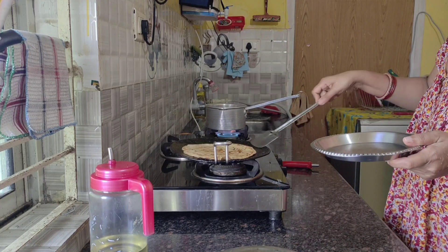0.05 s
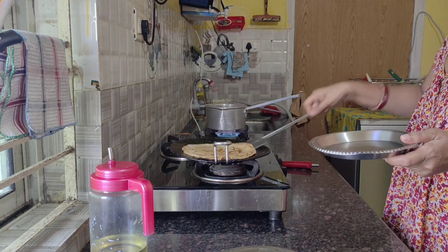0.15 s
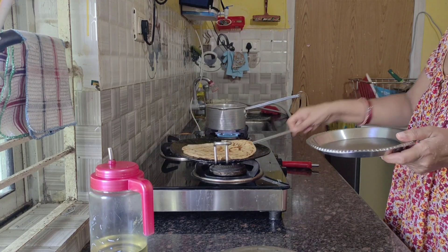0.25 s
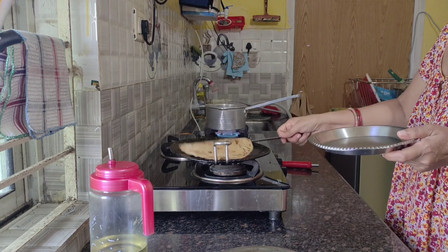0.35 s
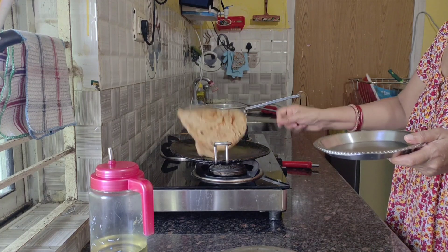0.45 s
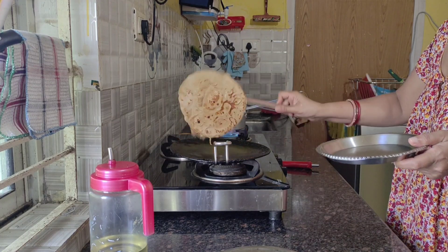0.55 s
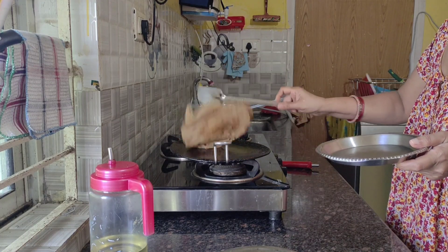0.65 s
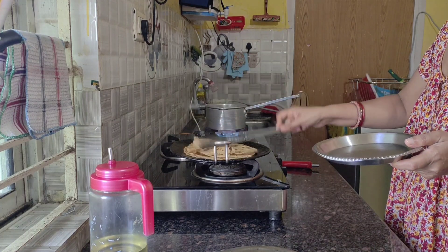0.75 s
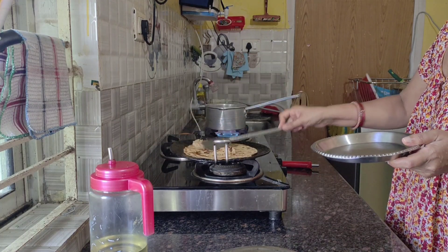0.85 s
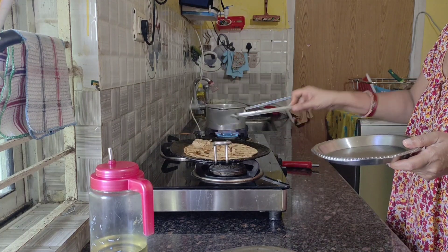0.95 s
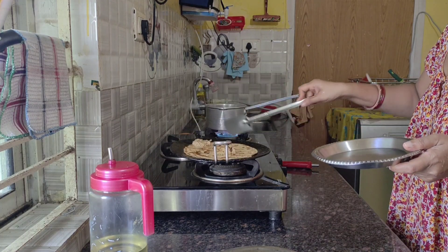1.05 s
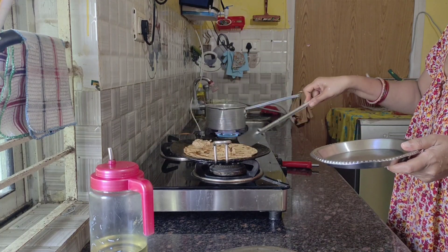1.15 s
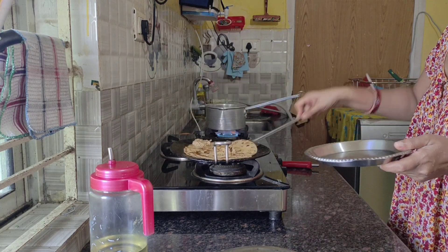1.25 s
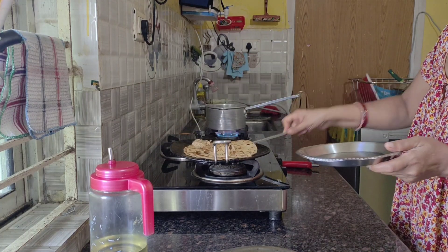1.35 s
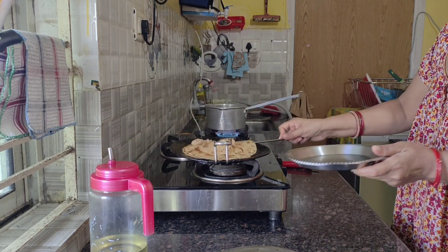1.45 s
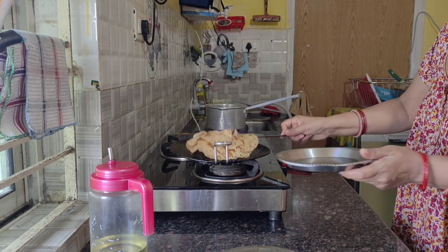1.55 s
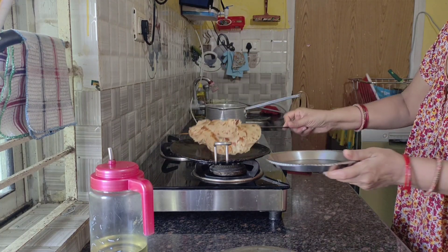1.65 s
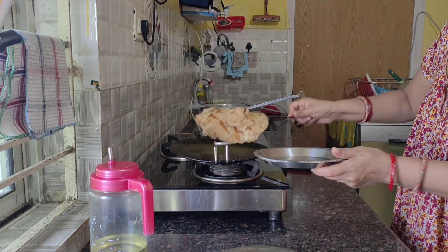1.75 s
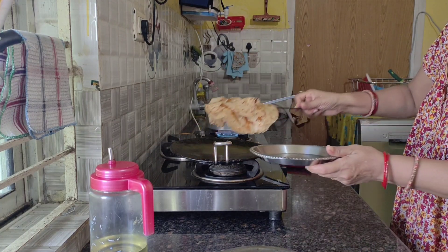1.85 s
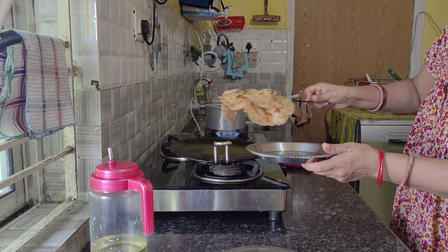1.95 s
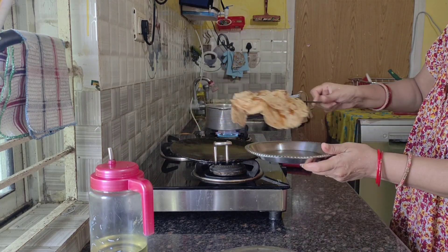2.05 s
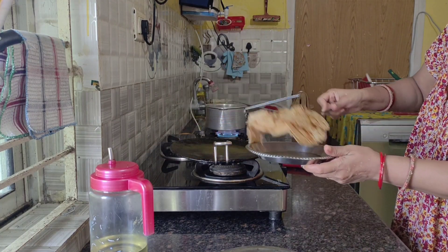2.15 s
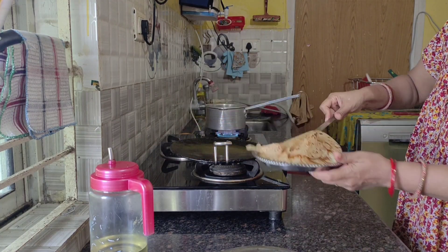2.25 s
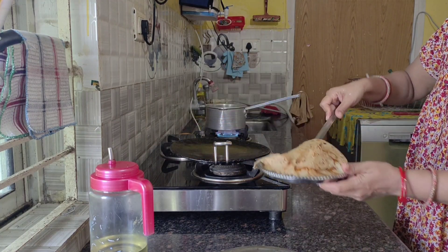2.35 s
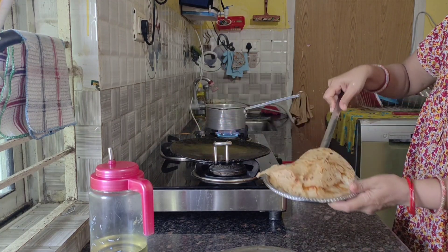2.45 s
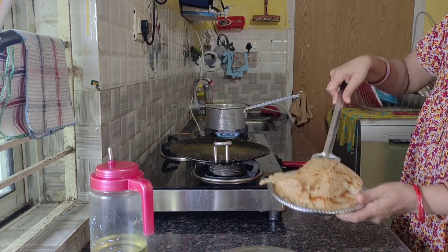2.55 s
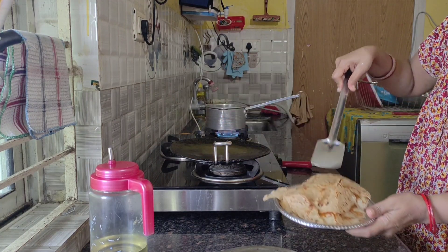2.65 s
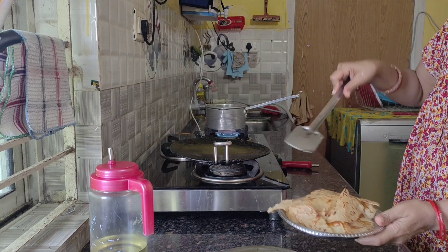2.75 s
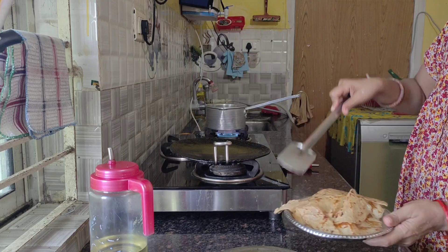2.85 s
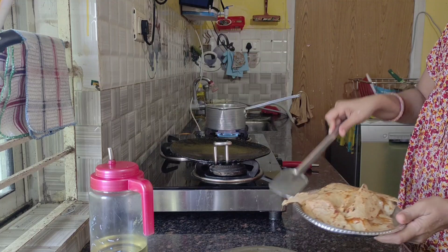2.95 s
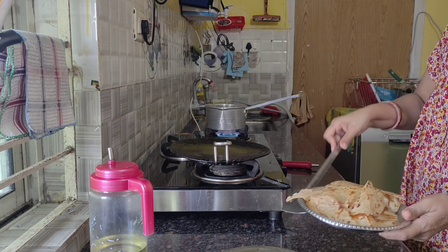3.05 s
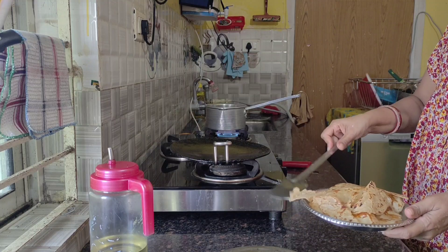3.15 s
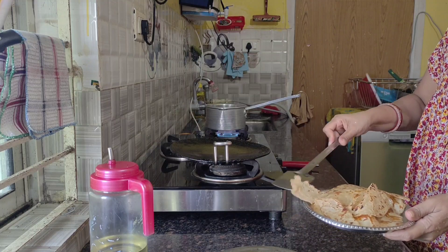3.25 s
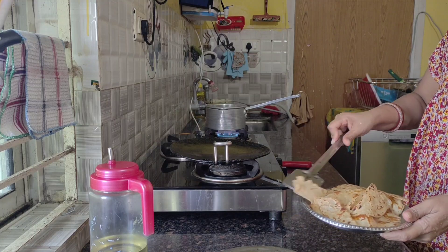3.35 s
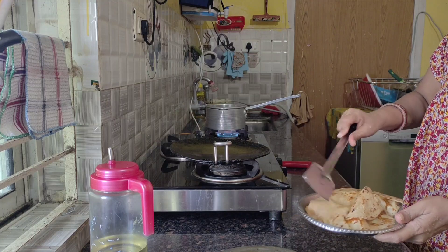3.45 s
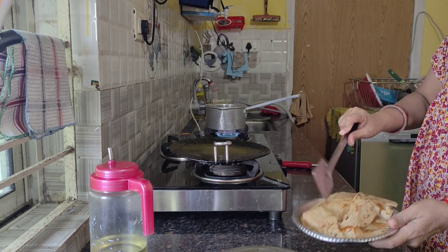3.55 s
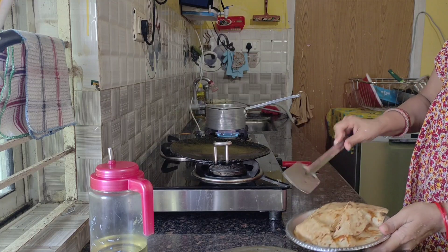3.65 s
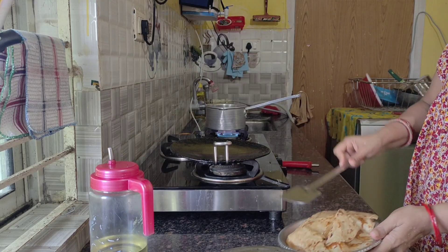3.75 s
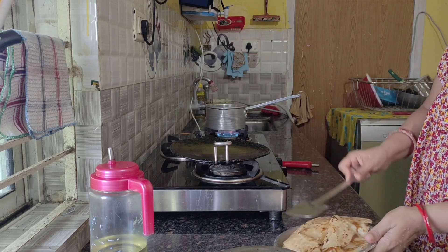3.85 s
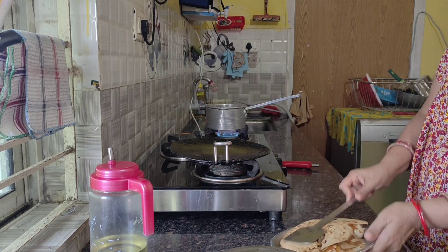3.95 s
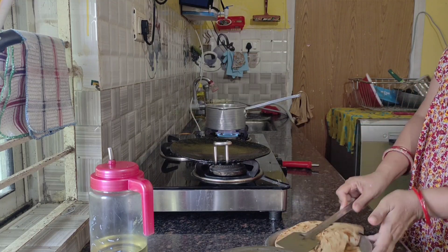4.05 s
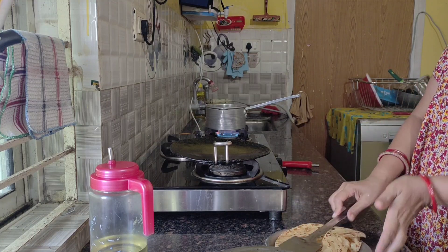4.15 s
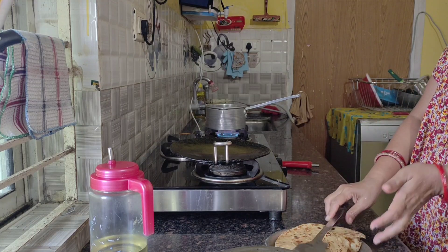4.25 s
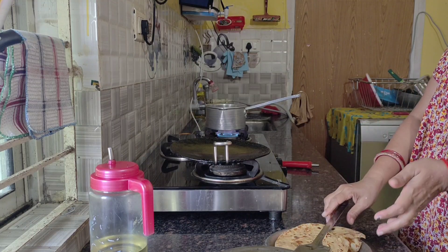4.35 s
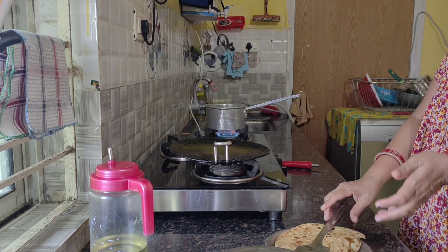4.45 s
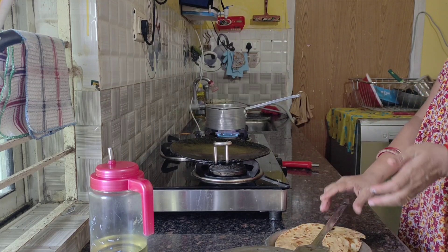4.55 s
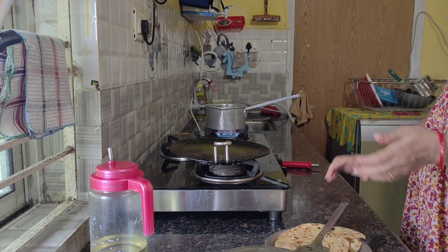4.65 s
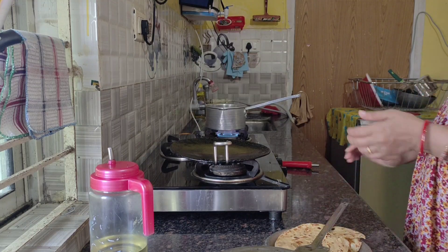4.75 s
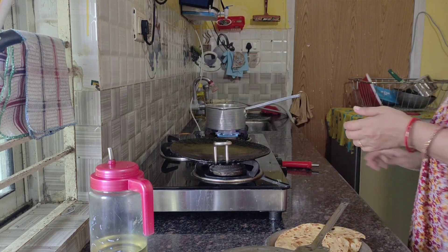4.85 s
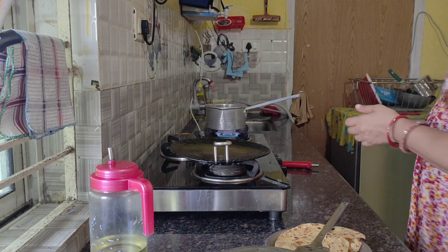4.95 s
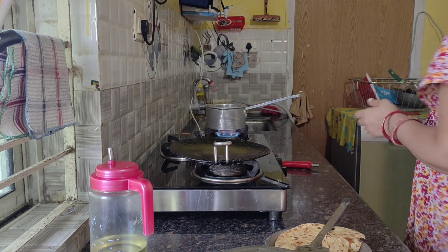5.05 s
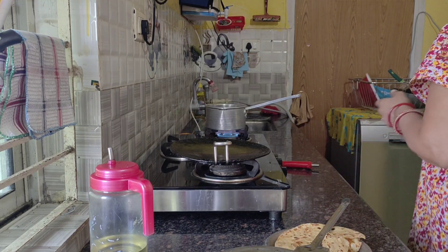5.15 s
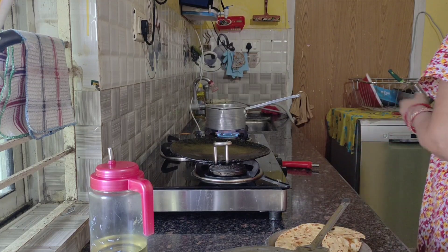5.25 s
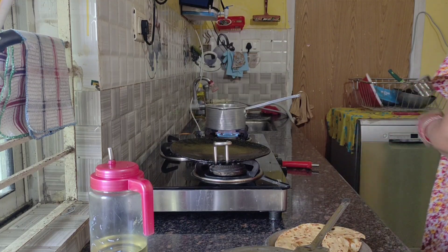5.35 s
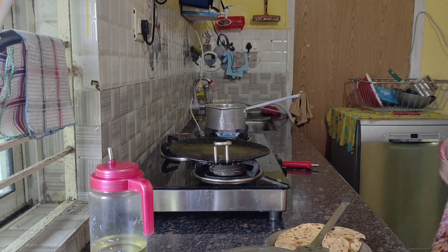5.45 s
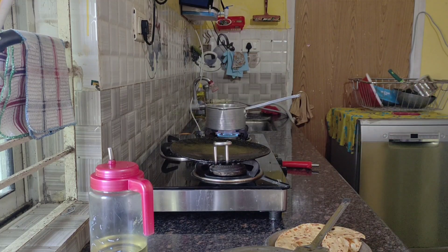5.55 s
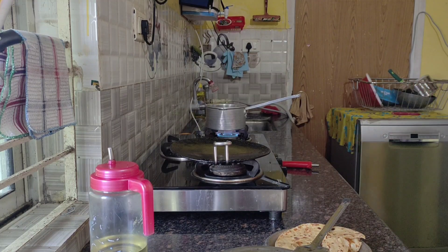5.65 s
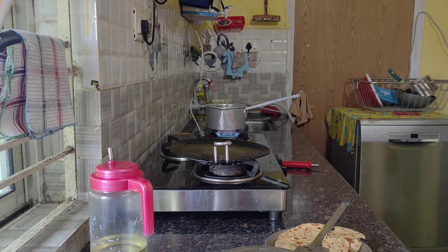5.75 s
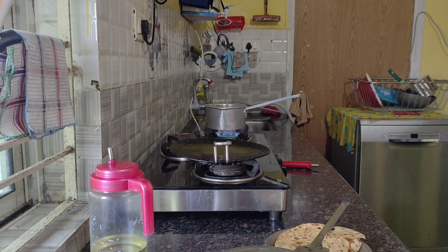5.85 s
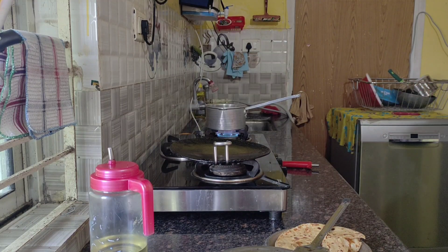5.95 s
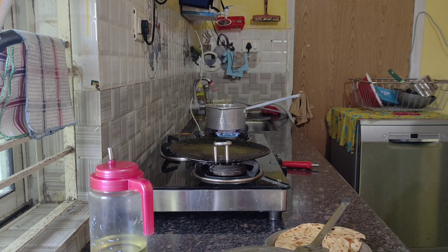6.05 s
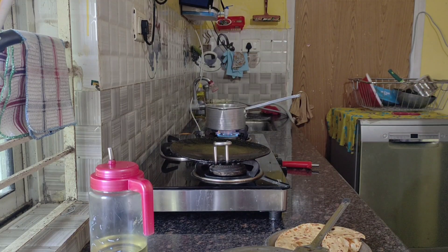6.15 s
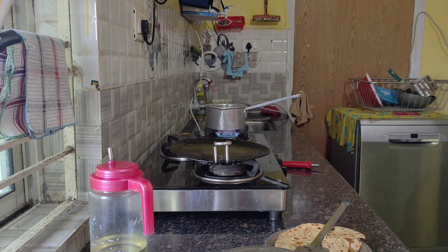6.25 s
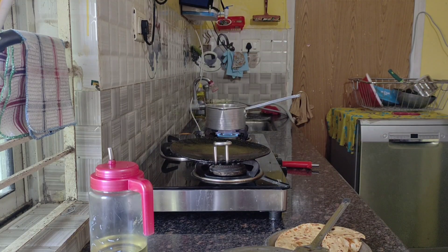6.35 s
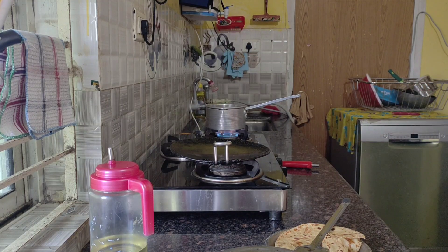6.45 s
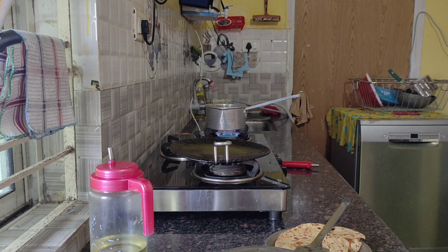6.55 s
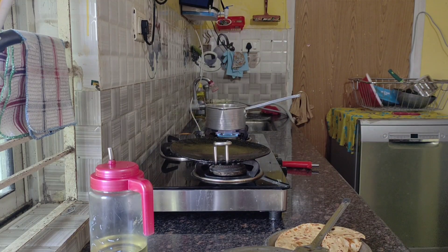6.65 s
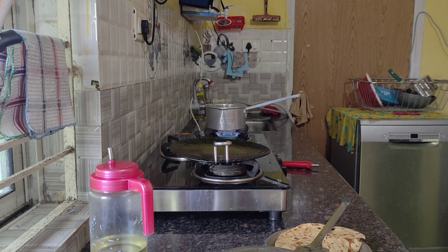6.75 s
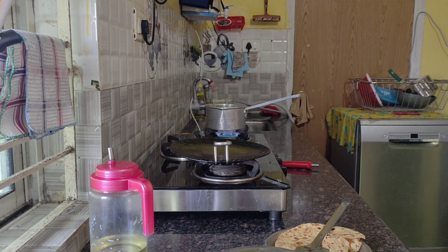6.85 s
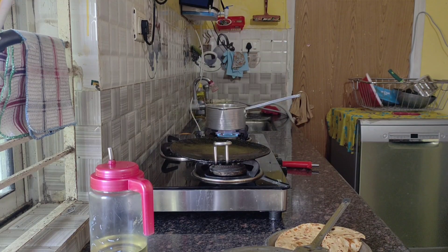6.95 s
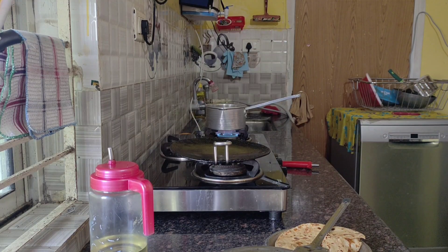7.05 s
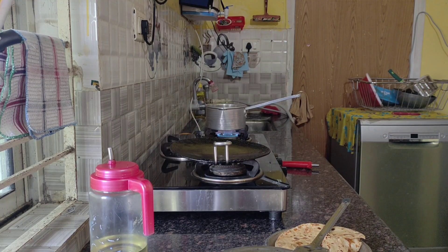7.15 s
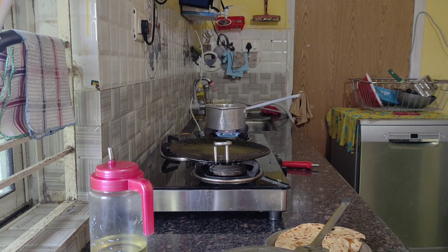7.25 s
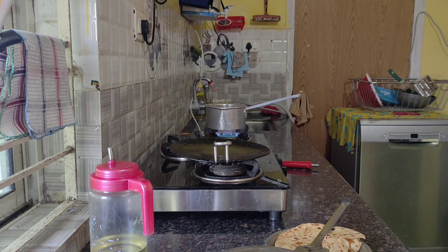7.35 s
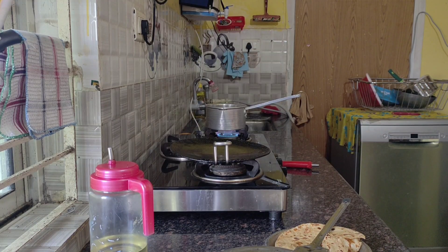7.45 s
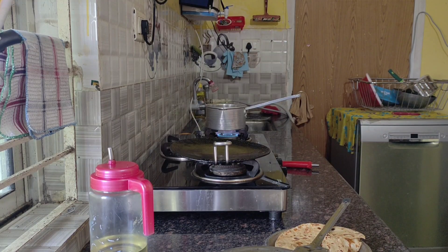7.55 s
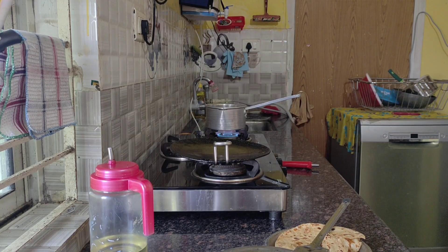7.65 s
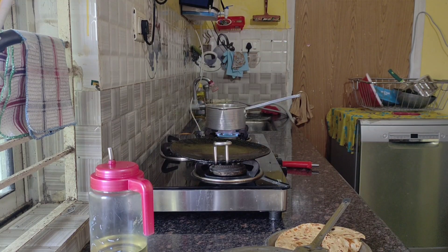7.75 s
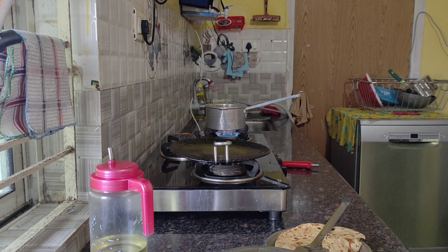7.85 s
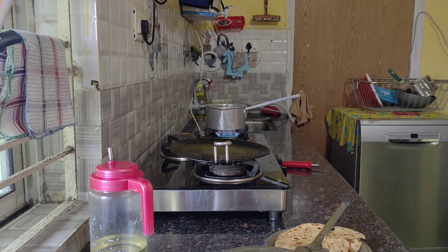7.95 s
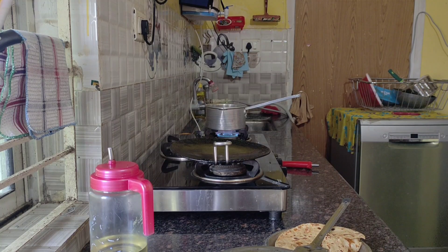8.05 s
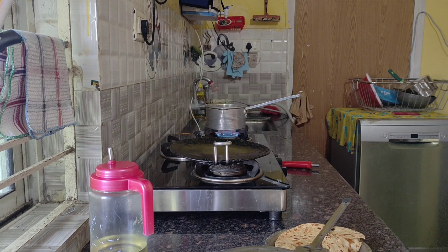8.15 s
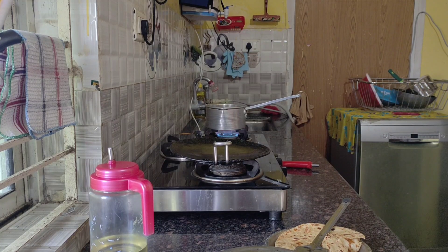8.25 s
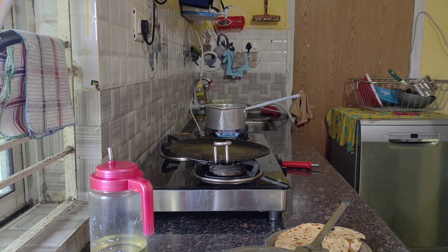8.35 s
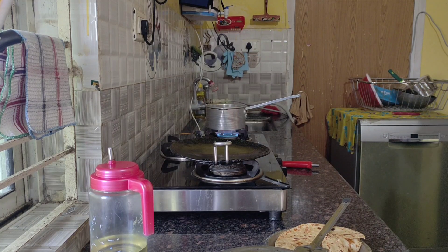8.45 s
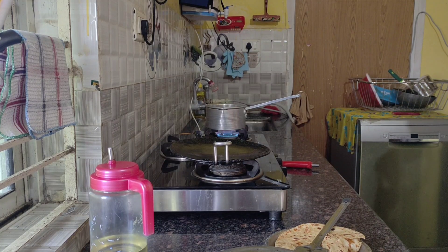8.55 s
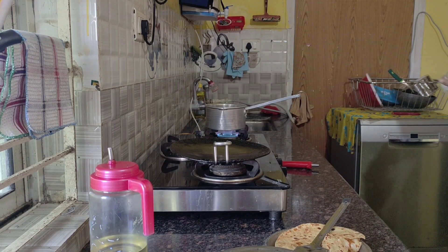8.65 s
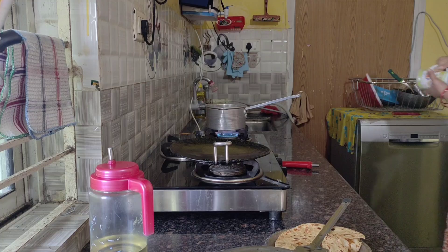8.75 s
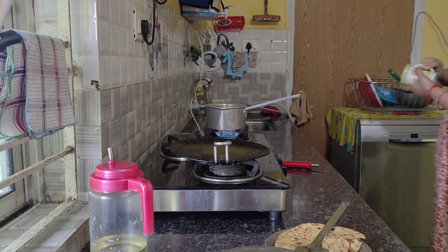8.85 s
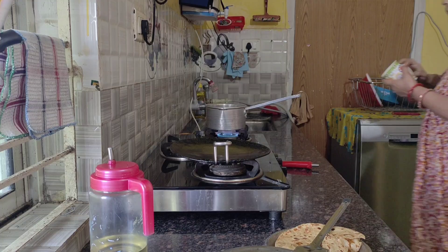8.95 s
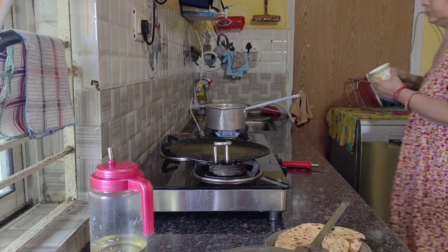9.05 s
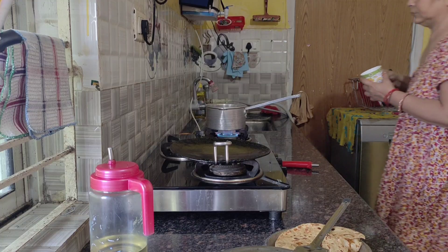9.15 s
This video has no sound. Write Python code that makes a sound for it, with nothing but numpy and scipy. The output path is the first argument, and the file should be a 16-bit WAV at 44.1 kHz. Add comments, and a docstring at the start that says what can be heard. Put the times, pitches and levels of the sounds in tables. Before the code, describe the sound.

In a small tiled kitchen, a steel spatula scrapes and taps an iron griddle close to the microphone, and the griddle knocks softly on its burner. Farther off, a steel plate lands loudly on a stone counter and the spatula clatters onto it. Slippers then shuffle over the floor, a lid clacks and steel cups clink across the room. A low fridge hum and faint hiss continue underneath.

```python
"""A steel spatula scrapes flatbread off an iron griddle, which rocks on its burner, in a small tiled kitchen.
A steel plate is set down on the stone counter and the spatula drops on it. The cook shuffles off in
slippers, clinks steel cups at a rack and returns. Each blow is a crack plus the object's ringing modes;
each scrape is a run of tiny slips. Griddle and slippers sound close, plate and cups farther off in the
room's echo, over a fridge hum. The microphone is a camera's stereo pair; its gain ducks the loudest blows."""
import sys
import numpy as np
from scipy import signal
from scipy.fft import rfft, irfft, next_fast_len
from scipy.io import wavfile
from scipy.ndimage import uniform_filter1d, map_coordinates

SR = 44100
rng = np.random.default_rng(int(sys.argv[2]) if len(sys.argv) > 2 else 0)


def int16_out(signal):
    """Quantize to a 16-bit WAV file."""
    q = np.round(np.clip(np.atleast_2d(signal).T, -1, 1) * 32767)
    wavfile.write(sys.argv[1], SR, q.astype(np.int16))


N = 406161

# Blows: start_s, level_db, tilt_db_per_octave, chatter_s, contact_point (0 to 1), ring_over_crack_db
SPATULA_BLOWS = [(.292, -37.5, -2, 0.011, 1, -14.5), (.518, -44, 0, 0.01, 0.7, -8.5),
                 (.8495, -23, -1.5, 0.0016, 0.35, -11), (1.078, -38.5, -2, .0033, 0.97, 10),
                 (1.231, -30.5, -2.5, 0.0032, 0.54, -4), (1.608, -40.5, -1, 0.009, 0.5, 1.5),
                 (2.4725, -24, -1, .008, 0.9, 20.5), (2.497, -26.5, -0.5, 0.011, 0.68, 12),
                 (2.675, -27, 3.5, 0.0095, 0.1, 16), (2.703, -38, 1, 0.0044, 0.1, 15.5)]
PLATE_BLOWS = [(3.9385, -7, -1, 0.0074, 1, 6.4), (3.967, -15, -1, 0.01, 0.9, 8.3),
               (4.016, -23, 3, .003, 0.33, 4), (4.2155, -14.5, -8, 0.0047, 0, 1),
               (4.223, -7, 2, .01, 0.046, 1.8), (4.245, -16.5, -2.5, .012, 0, 1.8)]
CUP_CLINKS = [(7.098, -20, 4, .012, 0.92, 22.9), (7.125, -19, 1, 0.014, 0.93, 20),
              (7.166, -22.5, 1.5, 0.011, 1, 15), (7.762, -17, 2, 0.012, 0.295, 6.58),
              (7.79, -14, 0, .018, 0.046, 15)]
# Blows at one contact point: start_s, level_db, tilt_db_per_octave, chatter_s
RIM_GLANCES = [(.8505, -37, -15, 0.0013), (1.231, -35.5, 1.5, 0.0015), (2.281, -34.5, 4.5, 0.025)]
LID_BLOWS = [(6.681, -25, 0.5, 0.02)]
# Spatula strokes: start_s, length_s, level_db, tilt_db_per_octave, ring_over_rasp_db
SPATULA_STROKES = [(0.029, 0.039, -34, 2.5, -6), (0.325, 0.056, -24, -0.5, 0), (0.848, 0.067, -33.5, 0, -8),
                   (1.404, 0.058, -24, 0, -2), (2.609, 0.054, -28.5, 4.5, -8.5),
                   (3.581, 0.07, -49, 2.5, -15)]
# The griddle tipping against its burner: start_s, level_db
BURNER_KNOCKS = [(.149, -40.5), (.248, -40), (.502, -41.5), (.563, -43.5), (.828, -32), (.923, -30.5),
                 (.966, -27.5), (1.058, -34.5), (1.212, -40.5), (1.236, -35.5), (1.274, -45), (1.38, -38),
                 (1.456, -42), (1.585, -38.5), (1.668, -41.5), (1.735, -49.5)]
# Slippers on the floor, plus one bright rustle of clothes at 6.012 s: start_s, length_s, level_db, swell_db,
# tilt_db_per_octave
SLIPPER_DRAGS = [(5.032, 0.025, -40, -3, 0.5), (5.508, 0.075, -42, -11, 0.5), (5.62, 0.067, -28, 5, 1),
                 (6.012, 0.042, -36, -13.5, 7.5), (6.05, 0.12, -35, 1, 1), (6.393, 0.0224, -28.5, -5, 0),
                 (6.832, 0.56, -40.5, -20.5, 4), (7.219, 0.19, -36, -4.5, 1),
                 (7.723, 0.014, -29.5, -3, -1.5), (7.939, 0.13, -41.5, -6, 1.5), (8.42, 0.087, -34, 0, 1.5),
                 (8.87, 0.12, -38.5, -1, 2), (9.035, 0.039, -36.5, -6.5, 2.5),
                 (9.122, 0.022, -33.5, -26, 2.5)]
# Stove, shelf and feet: start_s, level_db, tilt_db_per_octave
DULL_BUMPS = [(1.266, -38, 2), (6.393, -36, -6), (6.739, -35.5, 4.5), (6.815, -34.5, 4), (6.864, -34, -5),
              (7.725, -31, 2.5), (9.119, -35.5, 7)]

# Modes that depend on the contact point: pitch_hz, level_at_1_db, level_at_0_db, t60_s
SPATULA_MODES = [(450, 1, -24, .05), (790, -2, 3, .06), (1260, -2, -20, .03), (1630, 0, -26, .03),
                 (1873, -2, -9, .06), (2380, -10, -10, .04), (2789, -1, 3, .09), (3060, -4, -7, .03),
                 (3214, -14, 0, .08), (3420, -10, -3, .04), (3850, -5, -12, .045), (4382, -12, -6, .07),
                 (5270, -17, -10, .05), (7052, -9, -14, .05), (7494, -14, -6, .06)]  # 1 pressed down, 0 springing free
PLATE_MODES = [(735, -16, -4, .035), (825, -4, -3, .12), (930, -6, -6, .04), (1373, -16, -2, .04),
               (1860, -12, -9, .05), (2261, -19, -5, .09), (2762, -16, -10, .05), (2912, -15, -4, .08),
               (3036, -2, -3, .17), (3105, -5, 0, .13), (3195, -1, -1, .13), (3280, 1, -4, .07),
               (3368, 0, -6, .09), (3415, 2, -8, .14), (4240, -15, -8, .04)]  # 1 landing on its foot, 0 under the spatula
CUP_MODES = [(1157, -7, 4.5, .34), (1280, -2, -7, .26), (1954, -10, -17, .28), (2182, -11, -7, .22),
             (2442, -4, -8, .18), (3110, -9, 2, .45), (3752, 0, -1, .19), (5218, 2, -11, .16),
             (5598, -5, -6, .24), (6342, -20, -8, .16), (6657, 1, -12, .11), (7500, -7, -12, .06),
             (7936, -7, -19, .12), (8125, -6, -12, .09), (9350, -8, -12, .05), (12490, -14, -15, .04),
             (10440, -13, -17, .1), (13600, -12, -12, .03), (15000, -12, -23, .04)]  # 1 rim, 0 base
# Modes with one set of levels: pitch_hz, level_db, t60_s
RIM_MODES = [(3031, -3, .12), (3300, 0, .05), (3445, 6, .12), (3590, 3, .07), (4360, -6, .14),
             (5443, -4, .13), (8915, -12, .05), (6740, -5, .08), (7418, -11, .05)]
GRIDDLE_MODES = [(638, -4, .1), (707, 6, 0.14), (784, 3.5, 0.12), (1343, -2, 0.054), (2110, -7, .05)]
LID_MODES = [(1400, -2, .05), (1780, -7, .02), (2900, -5, .03), (3321, 0, .06), (3494, -5, .04),
             (5588, -2, .1), (6110, -10, .04), (7763, -4, .04)]
RACK_MODES = [(193, -1.5, 0.29), (243, 2, 1)]
# The blade pressed on the iron: pitch_hz, level_db
BLADE_MODES = [(1350, -0.5), (1520, -7), (1750, -5), (2095, -1), (2510, 2), (3115, 2), (3720, -1),
               (4960, -7), (5320, -2.5), (7100, -10)]

# Spectra of cracks, thuds, friction and room tone: frequency_hz, relative_level_db
SPATULA_SPECTRUM = [(120, -30), (300, -16.5), (600, -12), (3200, 6), (4800, -7.5), (8000, -9), (16000, -14)]
GRIDDLE_SPECTRUM = [(150, -8), (420, -5), (750, 12.5), (1500, -11), (2500, -12.5), (5000, -61),
                    (16000, -64)]
PLATE_SPECTRUM = [(120, -44.5), (300, -48), (570, -18.5), (790, 3), (1120, -6.5), (2560, -6.5), (3130, 4),
                  (3850, -15), (4900, -32), (11900, -18), (16000, -25)]
CUP_SPECTRUM = [(300, 5), (1200, 0), (3000, 7.5), (8000, 0), (16000, -17)]
COUNTER_THUD = [(40, -30), (85, 5), (160, 12.5), (260, -16), (16000, -72)]
DULL_THUD = [(50, -31), (120, -5.5), (175, 2.5), (280, -13.5), (700, -17.5), (2000, -40), (16000, -84.5)]
IRON_RASP = [(290, -50), (807, -26), (1320, -1.5), (3810, -3.5), (4300, -9.5), (5160, -7.5), (6140, -9.5),
             (16000, -14)]
SOLE_RASP = [(200, -16), (450, -14.5), (750, 2), (1300, 3), (2600, 4.5), (5000, -4.5), (9000, -13),
             (16000, -19)]
ROOM_TONE = [(15, -47.5), (25, -29.5), (70, -17.5), (102, -4), (263, -16), (300, -22.5), (451, -25.5),
             (754, -28), (3620, -40.5), (5880, -45), (16000, -44.5)]
# Decay of the tiled room: frequency_hz, t60_s
KITCHEN_DECAY = [(150, 0.11), (700, 0.31), (3000, 0.34), (8000, 0.27), (16000, 0.2)]
# Room tone across the two microphones: frequency_hz, likeness (below 0 counts as 0)
STEREO_LIKENESS = [(60, 0.98), (180, 0.96), (550, -1.2), (1650, -0.17), (4970, -0.084), (15000, -0.23)]
# The room tone's treble rising and falling: time_s, gain_db
TREBLE_DRIFT = [(0, 9), (1.9, 5), (3, 1.5), (4.6, -0.5), (5.3, 4), (7.6, -0.5), (9.2, 5.5)]
# Fridge hum: pitch_hz, level_db
FRIDGE_TONES = [(100.3, -49.5), (172, -54.5)]

TOP_HZ, EVENT_SAMPLES = 16000, 30000
BLADE_T60_S, SCRAPE_SWELL_DB = .06, -7.5  # the blade eases off over each stroke
FLEX, MOVE_S, CATCH_PER_S = 0.024, .04, 110  # relative pitch scatter; time between spots; catch rate
SHEET_FROM_HZ, SHEET_T60_S, SHEET_SCATTER_DB = 5600, .06, 4.5
GRIDDLE_TILT_DB, GRIDDLE_CHATTER_S, BUMP_CHATTER_S = 4, .011, 0.021
HARDENING = 0.13  # dB per octave of extra tilt for each dB above the average knock
DIRECT_RING_DB = -6.5  # ring reaching the microphones in a straight line, against the room's answer


def spatula_scrapes():
    """The spatula rasps under the bread; on bare iron its blade catches and rings, in bread it is muted."""
    blade = [(hz, db, BLADE_T60_S) for hz, db in BLADE_MODES]
    return sum(rubbed([(s, length, db, SCRAPE_SWELL_DB, tilt_db)], IRON_RASP, blade, ring_db,
                      grit_db=8, catch_db=4.5, direct_db=3, rise_share=1.15, release_s=.11)
               for s, length, db, tilt_db, ring_db in SPATULA_STROKES)


def spatula_taps():
    """Close by, the steel blade knocks and its thin rim glances off metal."""
    taps = struck_at(SPATULA_BLOWS, SPATULA_MODES, SPATULA_SPECTRUM,
                     direct_db=-1, bounce=.4, sheet_db=-4.5)
    rim = struck(RIM_GLANCES, RIM_MODES, SPATULA_SPECTRUM,
                 ring_db=16, direct_db=2, bounce=.5, sheet_db=-10)
    return taps + rim


def griddle():
    """The griddle knocks on its burner as the spatula pushes it; harder knocks are brighter."""
    average_db = np.mean([db for _, db in BURNER_KNOCKS])
    knocks = [(s, db, GRIDDLE_TILT_DB + HARDENING * (db - average_db), GRIDDLE_CHATTER_S)
              for s, db in BURNER_KNOCKS]
    return struck(knocks, GRIDDLE_MODES, GRIDDLE_SPECTRUM, ring_db=-3.5, direct_db=0.5, bounce=0.76)


def plate():
    """Farther off, the steel plate lands on stone and rings again as the spatula drops on it."""
    return struck_at(PLATE_BLOWS, PLATE_MODES, PLATE_SPECTRUM, direct_db=-9, bounce=.5, sheet_db=-13)


def lid():
    """A lid clacks and rings briefly, heard mostly by way of the room."""
    return struck(LID_BLOWS, LID_MODES, CUP_SPECTRUM, ring_db=8, direct_db=-12, bounce=.4)


def cups():
    """Steel cups clink across the room, a touch louder in the left microphone."""
    return struck_at(CUP_CLINKS, CUP_MODES, CUP_SPECTRUM, direct_db=-8, bounce=.45) * amp([[.5], [-.5]])


def slippers():
    """Soles drag over the floor, close and dry; once, clothes rustle brightly."""
    return rubbed(SLIPPER_DRAGS, SOLE_RASP, [], ring_db=0,
                  grit_db=4.5, catch_db=1, direct_db=14, rise_share=0.88, release_s=0.071)


def thumps():
    """The counter thuds under the plate and the rack under the cups; stove, shelf and feet bump."""
    on_counter = passed_on(PLATE_BLOWS, gain_db=-27, tilt_db=-8)
    on_rack = passed_on(CUP_CLINKS, gain_db=-23, tilt_db=-23.5)
    bumps = [(s, db, tilt_db, BUMP_CHATTER_S) for s, db, tilt_db in DULL_BUMPS]
    counter = struck(on_counter, [], COUNTER_THUD, ring_db=0, direct_db=-11, bounce=0.67)
    rack = struck(on_rack, RACK_MODES, DULL_THUD, ring_db=26, direct_db=9.0, bounce=1.0)
    return rack + counter + struck(bumps, [], DULL_THUD, ring_db=0, direct_db=-8.0, bounce=0.77)


def passed_on(hits, gain_db, tilt_db):
    """The blows on an object as they reach what it stands on."""
    return [(s, db + gain_db, tilt_db, chatter) for s, db, _, chatter, _, _ in hits]


def rubbed(strokes, spectrum, modes, ring_db, grit_db, catch_db, direct_db, rise_share, release_s):
    """Friction: tiny slips of uneven size, bunched where the surface catches."""
    out = np.zeros((2, N))
    spots = 3  # a stroke passes over these, each with its own echoes and flex of the modes
    for s, length, db, swell_db, tilt_db in strokes:
        lead = min(s, EVENT_SAMPLES / SR / 4)
        t = np.arange(EVENT_SAMPLES) / SR - lead
        edges = np.maximum(-t / (rise_share * length), 0) + np.maximum((t - length) / release_s, 0)
        force = amp(swell_db * np.clip(t / length, 0, 1) - 20 * edges)
        slips = force * rng.standard_normal(t.size)
        slips *= amp(grit_db * wobble(1500, t.size) + catch_db * wobble(CATCH_PER_S, t.size))
        sound = np.zeros((2, t.size))
        for k in range(spots):
            here = slips * np.sqrt(np.maximum(np.cos(2 * np.pi * (t / MOVE_S - k) / spots), 0))
            path = through(kitchen(direct_db), here)
            flexed = [(hz * np.exp(FLEX * rng.standard_normal()), level, t60) for hz, level, t60 in modes]
            rasp = unit(through(path, colour(spectrum, tilt_db)))
            sound += np.linalg.norm(here) * (rasp + amp(ring_db) * ringing(path, flexed, tilt_db))
        peak_power = uniform_filter1d(np.mean(sound ** 2, axis=0), SR // 40).max()
        add(out, s - lead, amp(db) * sound / np.sqrt(peak_power))
    return out


def struck(hits, modes, crack, ring_db, direct_db, bounce, sheet_db=None):
    """All the blows on one object."""
    out = np.zeros((2, N))
    for s, db, tilt_db, chatter in hits:
        add(out, s, amp(db) * blow(modes, crack, tilt_db, chatter, ring_db, direct_db, bounce, sheet_db))
    return out


def struck_at(hits, modes, crack, direct_db, bounce, sheet_db=None):
    """Blows on an object whose contact point decides which modes wake."""
    out = np.zeros((2, N))
    for s, db, tilt_db, chatter, point, ring_db in hits:
        woken = [(hz, point * one_db + (1 - point) * zero_db, t60) for hz, one_db, zero_db, t60 in modes]
        add(out, s, amp(db) * blow(woken, crack, tilt_db, chatter, ring_db, direct_db, bounce, sheet_db))
    return out


def blow(modes, crack, tilt_db, chatter, ring_db, direct_db, bounce, sheet_db):
    """Contacts excite a broad crack, the modes and any thin steel; the room carries them all."""
    force = contacts(chatter, bounce)
    path = through(kitchen(direct_db), force)
    ring = ringing(path + amp(DIRECT_RING_DB) * force, modes, tilt_db)
    if sheet_db is not None:
        ring += amp(sheet_db) * slope(TOP_HZ / 2, tilt_db) * unit(through(path, sheet()))
    sound = unit(through(path, colour(crack, tilt_db))) + amp(ring_db) * ring
    return sound / np.sqrt(np.mean(sound[:, :SR // 20] ** 2) + 1e-20)  # rms 1 over the first 50 ms


def contacts(chatter, bounce, count=7):
    """A first touch and a few weakening rebounds."""
    when, size = rng.uniform(.2, 2.5, count), rng.uniform(.3, 1, count)
    where = np.clip(when * chatter * SR, 0, EVENT_SAMPLES - 1).astype(int)
    force = np.bincount(where, bounce * size * np.exp(-when / 2), minlength=EVENT_SAMPLES)
    force[0] += 1
    return force


def ringing(force, modes, tilt_db):
    """The force drives each mode to its share of the energy, a little differently every time."""
    ring = np.zeros_like(force)
    for hz, db, t60 in modes:
        pole = amp(-60 / (max(t60, .01) * SR)) * np.exp(2j * np.pi * hz / SR)
        mode = signal.lfilter([1, 0, -1], [1, -2 * pole.real, abs(pole) ** 2], force)
        ring += unit(mode) * amp(db + rng.standard_normal()) * slope(hz, tilt_db)
    return unit(ring)


def sheet(count=44):
    """Thin steel has a crowd of brief high modes; each blow wakes them differently."""
    t = np.arange(SR // 10) / SR
    hz = rng.uniform(SHEET_FROM_HZ, TOP_HZ, (count, 1))
    sizes = amp(SHEET_SCATTER_DB * rng.standard_normal((count, 1)))
    return np.sum(sizes * np.sin(2 * np.pi * hz * t), axis=0) * amp(-60 * t / SHEET_T60_S)


def kitchen(direct_db):
    """One spot in the room: an early burst off the counter, then echoes. More direct_db sounds closer."""
    t = np.arange(EVENT_SAMPLES) / SR
    hz, frames, noise = signal.stft(rng.standard_normal((3, t.size)), SR, nperseg=256)
    decay = amp(-60 * frames / along(KITCHEN_DECAY, hz)[:, None])
    tails = signal.istft(noise * decay, SR, nperseg=256)[1][:, :t.size]
    # long waves reach both microphones alike
    shared = filtered(tails[2], lambda hz: 0.13 + 3 / (1 + (hz / 200) ** 2))
    own = filtered(tails[:2], lambda hz: hz / (hz + 120))
    early = amp(direct_db + 2.0) * np.exp(-t / 0.0047)
    room = (own + shared) * (1 + early) * (1 - np.exp(-t / 0.0018))
    return room / np.linalg.norm(room[0])


def room_tone():
    """Low rumble, alike at both microphones, under a wide hiss that slowly rises and falls."""
    def mid_and_side(hz):
        width = np.arccos(np.clip(along(STEREO_LIKENESS, hz), 0, 1)) / 2
        return amp(along(ROOM_TONE, hz)) * [np.cos(width), np.sin(width)]
    mid, side = filtered(rng.standard_normal((2, N)), mid_and_side)
    air = amp(-45.5) * unit(np.array([mid + side, mid - side]))
    treble = filtered(air, lambda hz: hz ** 2 / (hz ** 2 + 1500 ** 2))
    drift_db = np.interp(np.arange(N) / SR, *np.transpose(TREBLE_DRIFT))
    return air + (amp(drift_db) - 1) * treble


def fridge():
    """Two low tones hum, wavering in level and phase."""
    t = np.arange(N) / SR
    return sum(amp(db + 0.81 * wobble(11, N)) * np.sqrt(2)
               * np.sin(2 * np.pi * hz * t + 1.54 * wobble(10.0, N)) for hz, db in FRIDGE_TONES)


def whistle():
    """One faint, narrow band of high hiss."""
    band = filtered(rng.standard_normal((2, N)), lambda hz: 1 / (1 + ((hz - 10450) / 400) ** 2))
    return amp(-66.5) * unit(band)


def gain_control(x, threshold_db, recover_db_per_s):
    """Loud blows pull the camera's gain down at once; it climbs back steadily."""
    power = np.abs(uniform_filter1d(np.mean(x ** 2, axis=0), SR // 200))
    excess_db = np.maximum(10 * np.log10(power + 1e-12) - threshold_db, 0)
    ramp = recover_db_per_s * np.arange(N) / SR
    cut_db = np.maximum.accumulate(excess_db + ramp) - ramp
    return x * amp(-uniform_filter1d(cut_db, SR // 300))


def colour(points, tilt_db):
    """A short causal pulse with this spectrum and tilt, rolled off below 110 Hz."""
    hz = np.fft.rfftfreq(4096, 1 / SR)
    gain = amp(along(points, hz)) * slope(hz, tilt_db) * hz ** 2 / (hz ** 2 + 110 ** 2)
    cepstrum = irfft(np.log(gain + 1e-6))
    cepstrum[1:len(hz) - 1] *= 2  # fold to minimum phase
    cepstrum[len(hz):] = 0
    return irfft(np.exp(rfft(cepstrum)))


def slope(hz, tilt_db):
    """Gain of a tilt in dB per octave about 3 kHz."""
    return amp(tilt_db * np.log2(np.maximum(hz, 100) / 3000))


def filtered(x, gain):
    """x times a gain that depends on frequency."""
    n = x.shape[-1]
    m = next_fast_len(n + 8192)
    return irfft(rfft(x, m) * gain(np.fft.rfftfreq(m, 1 / SR)), m)[..., :n]


def through(x, response):
    """Pass a stereo sound through a response."""
    return signal.fftconvolve(x, np.atleast_2d(response), axes=1)[:, :EVENT_SAMPLES]


def wobble(rate, size):
    """A smooth random curve with rate knots a second."""
    return map_coordinates(rng.standard_normal(int(size * rate / SR) + 4), [np.arange(size) * rate / SR])


def along(points, hz):
    """Read (frequency_hz, value) points on a log axis."""
    frequencies, values = np.transpose(points)
    return np.interp(np.log(hz + 1), np.log(frequencies + 1), values)


def amp(db):
    """Decibels to gain."""
    return 10 ** (np.asarray(db) / 20)


def unit(x):
    """Scale to rms 1."""
    return x / np.sqrt(np.mean(x ** 2) + 1e-20)


def add(out, s, x):
    """Mix x in at time s."""
    start = max(round(s * SR), 0)
    out[:, start:start + EVENT_SAMPLES] += x[:, :N - start]


def scene():
    """The kitchen at the microphones: griddle work, dishes and footsteps over the background."""
    blows = spatula_taps() + griddle() + plate() + lid() + cups() + thumps()
    return blows + spatula_scrapes() + slippers() + room_tone() + fridge() + whistle()


def record(dry):
    """The camera's gain control, soft peak limit and band limit."""
    held = gain_control(dry, threshold_db=-9.5, recover_db_per_s=15.0)
    limited = held / (1 + np.abs(held / .9) ** 6) ** (1 / 6)
    return filtered(limited, lambda hz: hz < TOP_HZ)


dry = scene()
out = record(dry)
int16_out(out)
```